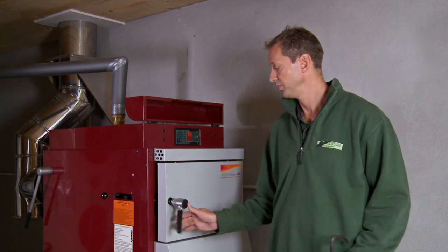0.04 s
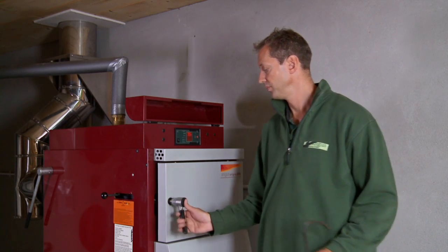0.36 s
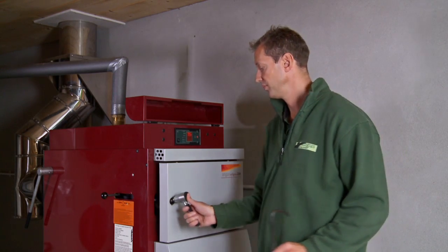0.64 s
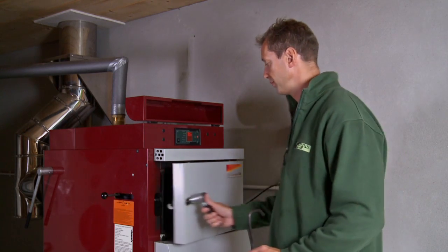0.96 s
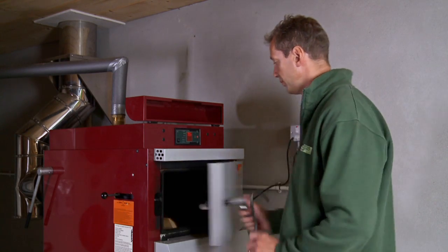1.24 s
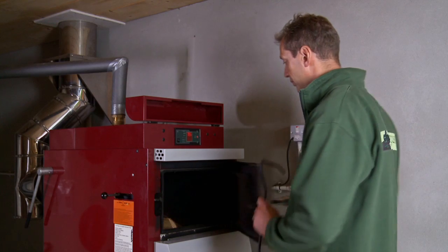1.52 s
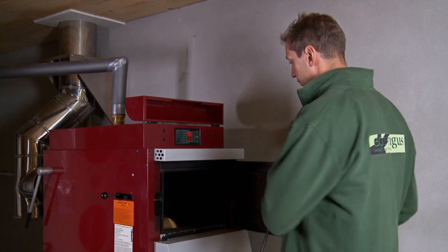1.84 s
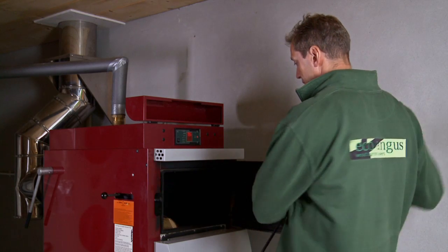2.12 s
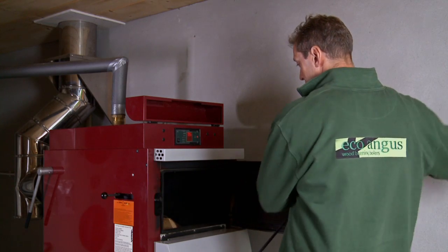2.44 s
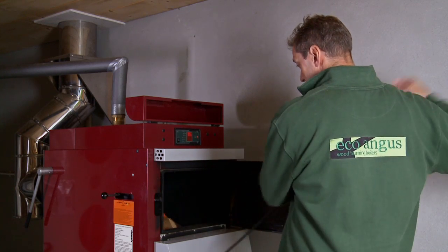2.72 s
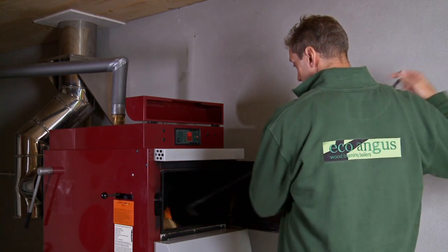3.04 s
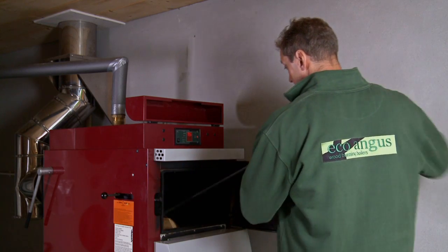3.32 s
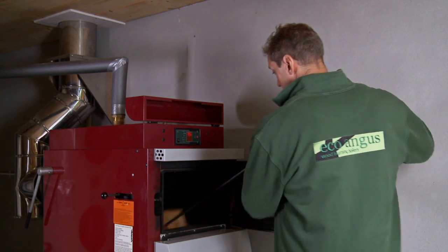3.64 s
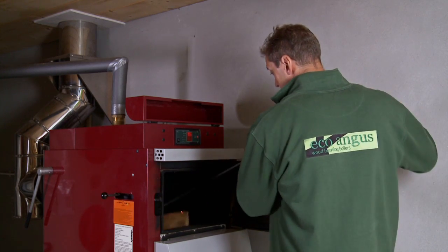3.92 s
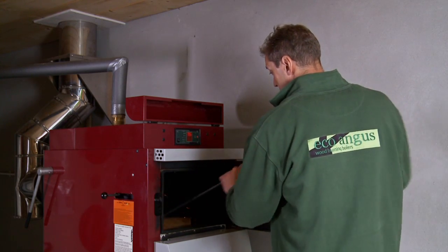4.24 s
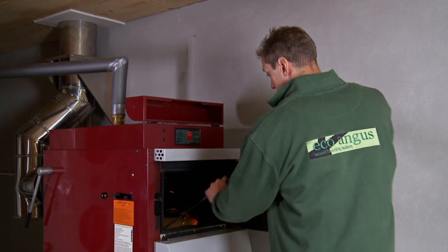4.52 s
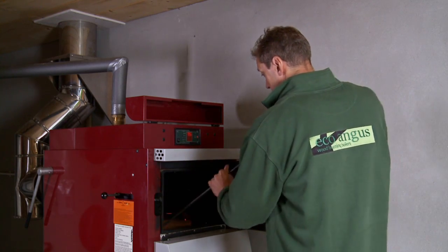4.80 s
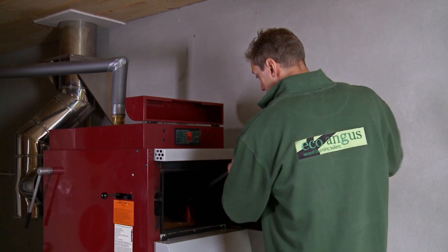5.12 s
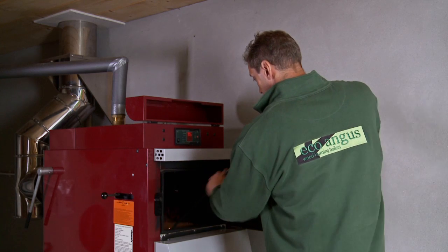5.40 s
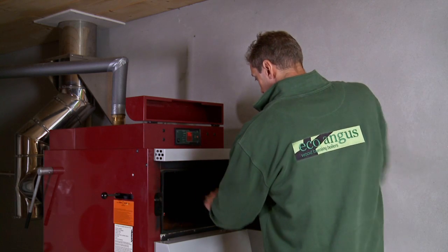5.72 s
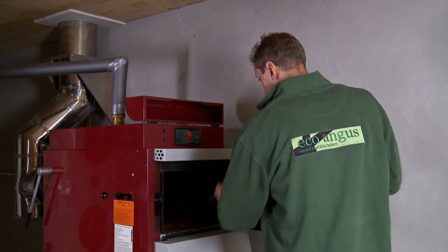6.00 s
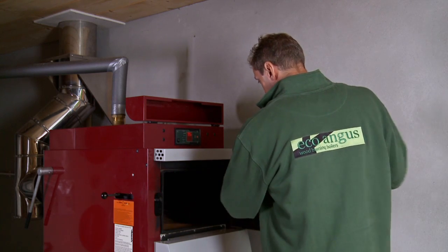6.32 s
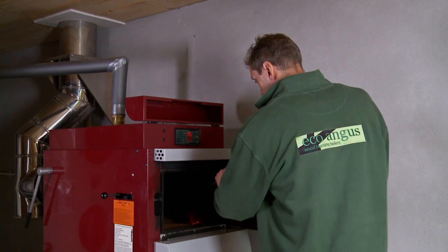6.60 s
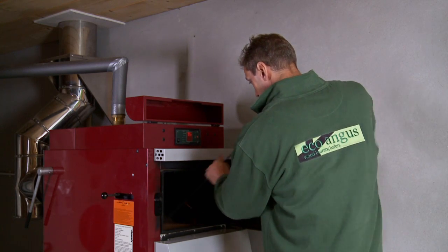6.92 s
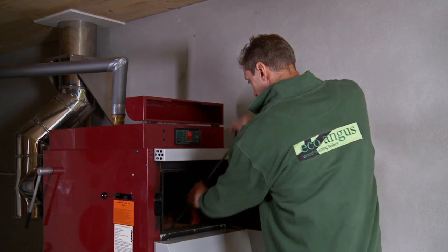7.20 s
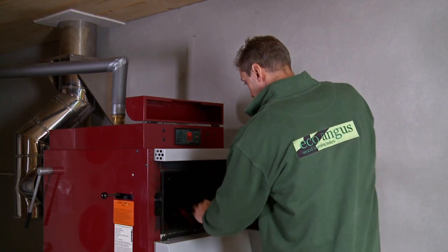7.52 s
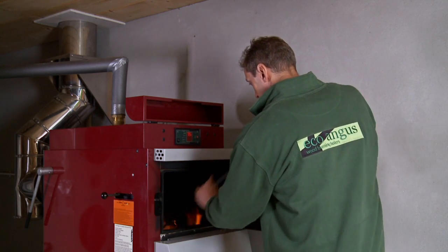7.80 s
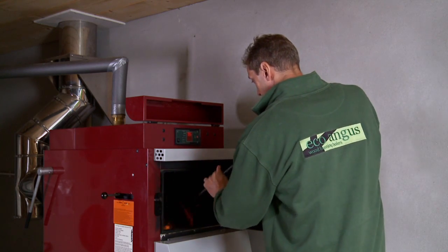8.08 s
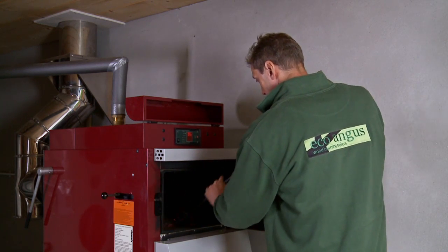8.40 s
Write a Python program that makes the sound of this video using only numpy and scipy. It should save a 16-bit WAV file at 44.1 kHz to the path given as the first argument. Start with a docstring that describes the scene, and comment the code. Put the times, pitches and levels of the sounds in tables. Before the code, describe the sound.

A fan hums steadily in a small room with a short echo. A latch clunks, and a boiler's heavy iron door knocks dully on its hinges as the hum swells and rushing air spills out. Sleeves rustle faintly. A steel poker then rakes crunching embers in uneven strokes, thumping and cracking charred logs, clanking against the firebox and giving brief squeals on the iron. Everything sounds fairly near the microphone.

```python
"""Poking a wood boiler

A draught fan hums in a small plastered room. The boiler's iron door is unlatched and swung wide,
which lets the fan's sound out of the firebox. A steel poker then rakes the embers, thumps and cracks
the charred logs, clanks against the firebox and squeals as it slides on the iron."""
import sys
import numpy as np
from scipy import signal
from scipy.fft import rfft, irfft, next_fast_len
from scipy.io import wavfile

SR = 44100
rng = np.random.default_rng(int(sys.argv[2]) if len(sys.argv) > 2 else 0)


def dump(signal):
    """Clip the signal to [-1, 1] and save it as 16-bit WAV at the path in sys.argv[1]."""
    limited = np.clip(np.atleast_2d(signal).T, -1, 1)
    pcm = np.round(limited * 32767).astype(np.int16)
    wavfile.write(sys.argv[1], SR, pcm)


N = 377055
TIME = np.arange(N) / SR

# The edges in Hz of four bands, from low to high: thud, knock, clang and fizz.
BAND_EDGES_HZ = [120, 700, 2200, 5500, 16000]
# What each kind of contact adds to its level at zero hardness: thud, knock, clang and fizz in dB.
CLANK_BANDS, STROKE_BANDS = (-11.5, -1.5, 5, -4), (0.5, 1, -3, -10)
THUMP_BANDS, CRACK_BANDS = (-1, -2, -14.5, -26), (-5, -0.5, -5, -11.5)
LATCH_BANDS, HINGE_BANDS = (4, -0.5, -8.5, -18.5), (-3, 0, -15, -31.5)

# Blows. Each row: start in seconds, relative level in dB, hardness in dB per octave (harder is
# brighter), t60 (the seconds it takes to fade by 60 dB), note of the struck spot in Hz.
POKER_HITS = [(4.502, -37.5, -7.5, 0.11, 2453), (5.318, -25, 3, 0.062, 4080),
              (7.08, -38.5, -1.5, 0.034, 2830), (7.157, -30, -4, 0.066, 2605),
              (7.546, -33.5, 2.4, 0.056, 3690), (7.621, -26.5, -0.94, 0.08, 3600),
              (8.487, -27, -0.7, 0.068, 2148)]   # the poker strikes the firebox
LOG_HITS = [(3.59, -42, 0.5, 0.05, 860), (4.38, -55, -7.5, 0.19, 340), (4.512, -47.5, -5.5, 0.42, 429),
            (5.839, -37.5, -1, 0.11, 617), (5.883, -42, 2, 0.053, 630), (6.462, -46.5, -6, 0.048, 540),
            (7.536, -30.5, 0.5, 0.16, 1007), (7.565, -32.5, 0.5, 0.32, 511), (7.642, -30, 2, 0.13, 942),
            (7.727, -36.5, 3, 0.093, 958), (8.493, -40, -3, 0.16, 443)]   # logs tumble
LATCH_HITS = [(0.479, -56, -1.5, 0.19, 392), (0.516, -53.5, 1, 0.19, 1940), (0.5485, -35.5, 2, 0.071, 1960),
              (0.567, -46, -0.5, 0.33, 438), (0.692, -53.5, -1.5, 0.17, 427)]   # the handle turns, the latch lets go, the door jumps
HINGE_HITS = [(1.227, -47, -2, 0.1, 820), (1.374, -53, -2, 0.16, 455), (1.519, -42.5, -2, 0.058, 397),
              (1.665, -51, -3, 0.09, 380), (1.727, -39.5, 0, 0.07, 865), (1.869, -41.5, 2.5, 0.18, 414),
              (1.886, -44, -2, 0.076, 420), (2.027, -32.5, 3, 0.075, 803), (2.075, -37.5, 3, 0.043, 850),
              (2.132, -31, 2, 0.072, 817), (2.394, -33.5, 3, 0.024, 2130)]   # the door knocks on its hinges as it swings and settles
# Charred wood cracks. Each row: start in seconds, relative level in dB, hardness in dB per octave.
WOOD_CRACKS = [(3.722, -50.5, 0), (3.744, -54, 3.5), (3.762, -51, 2.5), (3.786, -53, 3), (3.817, -44, -0.5),
               (3.895, -52.5, 3), (4.031, -52, -1.5), (4.852, -51.5, -0.5), (5.485, -44, 2.5),
               (5.736, -45, 1.5), (5.928, -50.5, 1.5), (6.376, -52.5, 0), (6.423, -49, 0.5),
               (6.602, -45.5, -3.5), (6.667, -41, -1), (6.778, -33, -2.7), (6.882, -52.5, 6),
               (6.992, -46.5, 1), (7.403, -42, 1.5), (7.421, -43, 1.5), (8.2, -60, 6.5)]
# The poker rakes the embers. Each row: start and end in seconds, level in dB, hardness in dB per octave.
RAKE_STROKES = [(3.715, 3.96, -53.5, -0.5), (3.98, 4.15, -62, 0), (4.355, 4.49, -54, -1.3),
                (4.488, 4.572, -57.5, 3.5), (4.644, 4.717, -49, -3.5), (4.79, 4.925, -53.5, 0.5),
                (4.907, 5.002, -51, -2), (5.093, 5.218, -56.5, 0.5), (5.452, 5.586, -44, -2.5),
                (5.74, 5.815, -48, -0.5), (5.852, 5.88, -43.5, 0), (5.92, 6.026, -54.5, -0.1),
                (6.129, 6.177, -56, 1.5), (6.248, 6.313, -57.5, 1), (6.453, 6.58, -52.5, -0.1),
                (6.88, 6.951, -57.5, 1.5), (7.082, 7.11, -45.5, -0.5), (7.145, 7.254, -43, -1.5),
                (7.257, 7.343, -46, -1.5), (7.38, 7.52, -48, -1), (7.517, 7.774, -49.5, -1),
                (7.819, 7.97, -51.5, 0), (8.022, 8.065, -56, 2), (8.118, 8.431, -55.5, 0.5)]
# The poker slides on iron. Each row: start and end in seconds, note in Hz, note and overtones in dB.
POKER_SLIDES = [(4.368, 4.607, 2570, -82, -67), (4.633, 4.725, 3500, -60, -58.5),
                (4.924, 4.994, 7650, -64, -52), (4.932, 4.992, 1770, -46, -62),
                (5.52, 5.587, 3430, -54, -52.5), (5.978, 6.043, 4000, -64, -75),
                (6.449, 6.603, 3930, -57.5, -79), (7.82, 7.896, 3930, -62, -71),
                (8.029, 8.06, 3970, -50, -65), (8.235, 8.293, 3930, -61, -56)]
# The door seal rubs, then sleeves do. Each row: start and end in seconds, rub in dB, hiss in dB.
SOFT_RUBS = [(0.694, 0.774, -51.5, -73), (0.918, 0.957, -62.5, -73), (2.239, 2.31, -50, -63),
             (2.53, 2.646, -72, -70), (2.7, 2.822, -64, -70), (2.832, 2.916, -71, -63.5),
             (3.1, 3.18, -81, -73)]
# How freely the firebox sounds into the room. Each row: time in seconds, opening from 0 to 1.
DOOR_OPENING = [(0.6, 0), (0.8, 0.03), (1.05, 0.23), (1.3, 0.64), (1.7, 0.79), (2.1, 0.88), (3.5, 0.75),
                (5.0, 1), (8.5, 0.93)]

# Modes, the pitches a thing rings at. Each row: pitch in Hz, width in Hz, relative strength in dB.
ROD_MODES = [(950, 30, -9), (2135, 33, -8), (2290, 26, -6), (2500, 60, -4), (2831, 27, 0), (3100, 40, -6),
             (3550, 47, 0), (3978, 50, 0), (4240, 33, -8), (4885, 56, -6), (5170, 45, -11), (5601, 35, -5),
             (6260, 80, -12), (6620, 70, -11), (6810, 50, -14), (7450, 30, -12), (7620, 33, -11),
             (8160, 35, -13), (8460, 30, -12), (9100, 70, -18), (9740, 40, -17), (10200, 45, -21),
             (11280, 60, -23), (11990, 60, -25), (12800, 90, -26)]   # the steel poker
BOLT_MODES = [(156, 22, -10), (228, 25, 1), (334, 30, -1), (426, 50, 8), (568, 40, 5.5), (790, 40, -19),
              (1146, 51, 6), (1470, 29, -3), (1770, 30, -10), (1860, 30, -3), (2200, 50, -11),
              (2850, 55, -31), (3530, 28, -9), (3670, 45, -4), (5100, 80, -15), (7360, 80, -28)]   # the latch bolt
DOOR_MODES = [(427, 50, 3.5), (644, 40, -28), (762, 50, 4), (952, 50, 6), (1155, 50, -3), (1474, 35, 0.5),
              (1770, 60, 2.5), (1910, 60, -14), (2420, 50, -5), (2670, 32, -4), (3030, 32, -9),
              (3800, 36, -17), (11530, 90, -25)]   # the iron door
FIREBOX_MODES = [(57, 16, 5.9), (116, 11, 8), (164.3, 46, 10.9), (323.4, 69, 15.7), (500, 88, 10.5),
                 (659.5, 45, 16), (790, 16, 8.4), (851, 61, 23), (1244, 188, 18.3), (2450, 170, 5.4),
                 (2720, 590, 5.7), (4440, 330, 4.5)]   # the air inside the firebox

# Colours, how noise is spread from bass to treble. Each row: frequency in Hz, relative level in dB.
IRON_COLOUR = [(30, -43.5), (80, -31.5), (150, 0), (400, 7.5), (1000, 4), (2200, 4.5), (3800, 8), (5000, 0),
               (8000, -5.5), (12000, -12), (16000, -21)]   # the struck firebox
CHAR_COLOUR = [(40, -52), (100, -28), (170, -1), (450, 2), (1300, 3), (2600, -10.5), (5000, -20.5),
               (9000, -19), (16000, -27)]   # charred wood
FRICTION_COLOUR = [(900, -16), (2000, 3), (3500, -11), (5000, -11), (8000, -2), (13000, 0), (16000, -4)]   # steel sliding on iron
PANEL_COLOUR = [(40, -55), (90, -28), (150, -7.5), (400, 8), (900, 4.5), (2100, 8), (3200, -6.5),
                (5000, -21), (9800, -29.5), (11300, -27), (12400, -39), (16000, -40)]   # the door panel
CLOTH_COLOUR = [(150, -7), (700, 10), (2500, 6.5), (5000, -5.5), (10000, -16), (16000, -25)]   # rubbing fibres
CASING_COLOUR = [(25, -41), (55, -26.5), (100, -7), (160, -0.5), (310, -1), (430, -9.5), (600, -8.5),
                 (800, -7), (1300, -14.5), (1900, -21.5), (2600, -22), (3500, -29), (6000, -35),
                 (16000, -38)]   # the boiler's casing
DRAUGHT_COLOUR = [(22, -31), (50, -9), (110, -1.5), (200, -1.5), (400, -8), (700, -5.5), (1000, -20.5),
                  (1500, -8.5), (1900, -18), (3400, -21.5), (6000, -29), (16000, -43)]   # rushing air


def poker(thump_s=5.3185, thump_hz=92, thump_t60=0.059):
    """Steel clanks on iron, stilled by the hand; a deep, short thump comes with the hardest blow."""
    clanks = blows(POKER_HITS, CLANK_BANDS, ROD_MODES, IRON_COLOUR, wash_db=-3.5, note_db=-3.5,
                   ring_db=-38.5, ring_t60=0.47, rise_s=0.0006, bass_hold=1.2, bass_trade=0)
    t = np.maximum(TIME - thump_s, 0)
    boom = from_db(-30) * np.sin(2 * np.pi * thump_hz * t)
    thud = from_db(-16) * coloured(rng.standard_normal(N), CASING_COLOUR)
    return from_db(0.5) * clanks + (boom + thud) * (t > 0) * fade(np.minimum(t, 1), thump_t60)


def logs(crack_t60=0.04, crack_hz=1247):
    """Logs thump dully and crack, barely stirring the rod. A crack rings briefly at a firebox mode."""
    thumps = blows(LOG_HITS, THUMP_BANDS, ROD_MODES, CHAR_COLOUR, wash_db=31.5, note_db=31,
                   ring_db=-28, ring_t60=0.37, rise_s=0.0011, bass_hold=0.98, bass_trade=1.1)
    crack_hits = [(*row, crack_t60, crack_hz) for row in WOOD_CRACKS]
    cracks = blows(crack_hits, CRACK_BANDS, ROD_MODES, CHAR_COLOUR, wash_db=28.5, note_db=24.5,
                   ring_db=-28, ring_t60=0.33, rise_s=0.00089, bass_hold=0.74, bass_trade=0.14)
    return from_db(-1.85) * thumps + from_db(-1.93) * cracks


def raking(trickle_span_s=(3.5, 8.55), trickle_db=-65):
    """Embers crumble under each stroke: crisp snaps over a fine rasp, both passing along the rod."""
    fractures = filtered(grains(per_s=60, spread_db=2.6, clump_db=2), 1, 2200, "high")
    snaps = bursts(fractures, decay_s=0.0032)
    rasp = grains(per_s=6700, spread_db=3.5, clump_db=3.5)
    rod = [(hz, width, db / 4) for hz, width, db in ROD_MODES]   # rubbing stirs the modes almost evenly
    scrape = coloured(0.95 * rms_one(snaps) + rms_one(rasp), CHAR_COLOUR, rod, peak_db=7)
    trickle = (*trickle_span_s, trickle_db, 0)   # embers keep trickling between strokes
    gains = 0
    for start, end, level_db, hardness in RAKE_STROKES + [trickle]:
        pressure = swell(start, end, attack_s=0.0079, release_s=0.025)
        levels_db = band_levels(level_db, hardness, STROKE_BANDS, bass_trade=0.079)
        gains = np.maximum(gains, np.outer(from_db(levels_db), pressure))
    return sum(gain * rms_one(filtered(scrape, 3, [low, high], "band"))
               for low, high, gain in zip(BAND_EDGES_HZ, BAND_EDGES_HZ[1:], gains))


def sliding(edge_s=0.0182, note_width_hz=100):
    """The rod sticks and slips on the iron like a bowed string, singing a note with overtones."""
    out = np.zeros(N)
    for start, end, note_hz, note_db, overtones_db in POKER_SLIDES:
        t = np.arange(round((end - start) * SR)) / SR
        slips = rng.standard_normal(len(t)) ** 3   # cubing makes the noise spiky
        note = rms_one(signal.lfilter(*signal.iirpeak(note_hz, note_hz / note_width_hz, SR), slips))
        overtones = coloured(slips, FRICTION_COLOUR, ROD_MODES, peak_db=26)
        pressure = np.minimum(np.minimum(t, t[::-1]) / edge_s, 1)
        at = round(start * SR)
        out[at:at + len(t)] += pressure * (from_db(note_db) * note + from_db(overtones_db) * overtones)
    return out


def door():
    """The latch clunks, then the heavy door knocks dully on its hinges."""
    latch = blows(LATCH_HITS, LATCH_BANDS, BOLT_MODES, PANEL_COLOUR, wash_db=7.5, note_db=-6,
                  ring_db=-24, ring_t60=0.32, rise_s=0.00089, bass_hold=0.99, bass_trade=1)
    hinge = blows(HINGE_HITS, HINGE_BANDS, DOOR_MODES, PANEL_COLOUR, wash_db=0.5, note_db=0.5,
                  ring_db=-42, ring_t60=0.27, rise_s=0.0013, bass_hold=1.5, bass_trade=1.36)
    return from_db(0.2) * latch + from_db(-0.14) * hinge


def rubbing(attack_s=0.035, release_s=0.04):
    """Fibres slip in a fine, soft hiss that swells with each movement."""
    slips = grains(per_s=9700, spread_db=1, clump_db=2)
    rub = coloured(slips, CLOTH_COLOUR)
    hiss = rms_one(filtered(slips, 2, 5500, "high"))
    return sum(swell(start, end, attack_s, release_s) * (from_db(rub_db) * rub + from_db(hiss_db) * hiss)
               for start, end, rub_db, hiss_db in SOFT_RUBS)


def fan(blade_hz=285.7, shut_db=-58, open_db=-46.5):
    """The blades hum over rushing air; the open door lets out more hum and the firebox's draught."""
    opening = door_opening()
    phase = 2 * np.pi * blade_hz * TIME + 0.56 * drift(0.64) + 0.08 * drift(7.6)   # swirling air jostles it
    hum = np.sqrt(2) * np.sin(phase) * from_db(1.75 * drift(15))
    casing = from_db(-57) * coloured(rng.standard_normal(N), CASING_COLOUR)
    draught = from_db(-50.5) * opening * coloured(rng.standard_normal(N), DRAUGHT_COLOUR, FIREBOX_MODES)
    return hum * (from_db(shut_db) + from_db(open_db) * opening) + casing + draught


def fire(level_db=-79):
    """Glowing wood ticks faintly by itself, heard once the door is open."""
    ticks = bursts(grains(per_s=9, spread_db=2, clump_db=1.5), decay_s=0.0015)
    return from_db(level_db) * door_opening() * rms_one(filtered(ticks, 2, 2500, "high"))


def room(x, t60=0.38, treble_t60=0.25, split_hz=3500, build_s=0.011):
    """Echoes from the close walls blur together; the treble dies first."""
    t = np.arange(SR // 2) / SR
    noise = rng.standard_normal(len(t))
    dull = filtered(noise, 1, split_hz, "low")
    echoes = dull * fade(t, t60) + (noise - dull) * fade(t, treble_t60)
    echoes *= 1 - np.exp(-(t / build_s) ** 2)
    return signal.fftconvolve(x, echoes / np.linalg.norm(echoes))[:N]


def blows(hits, bands_db, modes, colour, wash_db, note_db, ring_db, ring_t60,
          rise_s, bass_hold, bass_trade):
    """Each hit sets off clear modes, a note and a wash of noise; most dies fast, a little rings on."""
    t = np.arange(SR * 3 // 4) / SR
    hz, width, mode_db = np.transpose(modes)[:, :, None]
    out = np.zeros(N + len(t))
    for start, level_db, hardness, t60, note_hz in hits:
        strength = from_db(mode_db + 2.5 * rng.standard_normal(hz.shape))   # varies with the spot struck
        strength /= np.linalg.norm(strength)
        tones = np.sqrt(2) * np.sin(2 * np.pi * (hz * t + rng.random(hz.shape)))
        damped = fade(t, t60)
        # once the contact lets go, the modes ring on more evenly, the narrow ones longest
        free = np.sqrt(strength) * from_db(ring_db) * fade(t, ring_t60 / np.sqrt(width / np.median(width)))
        ringing = np.sum(tones * (strength * damped + free), axis=0)
        # weaker tones close by roughen the note
        neighbours = np.sin(2 * np.pi * note_hz * rng.uniform(0.92, 1.08, (4, 1)) * t).sum(axis=0)
        note = from_db(note_db) * (np.sin(2 * np.pi * note_hz * t) + 0.23 * neighbours)
        wash = from_db(wash_db) * coloured(rng.standard_normal(len(t)), colour)
        bass = filtered(wash, 1, 1200, "low")   # lasts bass_hold times as long as the rest
        blow = ringing + (note + wash - bass) * damped + bass * damped ** (1 / bass_hold)
        blow *= 1 - np.exp(-t / rise_s)
        levels_db = band_levels(level_db, hardness, bands_db, bass_trade)
        at = round(start * SR)
        out[at:at + len(t)] += balanced(balanced(blow, levels_db), levels_db)   # twice gets closer
    return out[:N]


def band_levels(level_db, hardness, bands_db, bass_trade):
    """Each band's level in dB: a harder contact gains treble and, scaled by bass_trade, loses thud."""
    centres = np.sqrt(np.multiply(BAND_EDGES_HZ[1:], BAND_EDGES_HZ[:-1]))
    octaves = np.log2(centres / centres[1])   # counted from the knock band
    return level_db + np.array(bands_db) + hardness * np.where(octaves < 0, bass_trade * octaves, octaves)


def balanced(x, levels_db):
    """Reshape a blow's tone so that its first 20 ms come near the given level in each band."""
    size, edges = SR // 50, np.array(BAND_EDGES_HZ)
    power = 2 * abs(rfft(x[:size]) / size) ** 2
    band_power, _ = np.histogram(np.fft.rfftfreq(size, 1 / SR), edges, weights=power)
    change_db = np.array(levels_db) - 10 * np.log10(band_power + 1e-20)
    hz = np.maximum(np.fft.rfftfreq(2 * len(x), 1 / SR), 1)
    tilt_db = np.interp(np.log(hz), np.log(edges[1:] * edges[:-1]) / 2, change_db)
    return irfft(rfft(x, 2 * len(x)) * from_db(tilt_db))[:len(x)]


def coloured(x, colour, modes=(), peak_db=0):
    """Give x a broad colour with any modes standing out of it, at an average level of 1."""
    size = next_fast_len(len(x))
    hz = np.maximum(np.fft.rfftfreq(size, 1 / SR), 1)
    points_hz, levels_db = np.transpose(colour)
    lift = 1 + sum(from_db(db + peak_db) ** 2 / (1 + (2 * (hz - centre) / width) ** 2) ** 2.54
                   for centre, width, db in modes)
    gain = from_db(np.interp(np.log(hz), np.log(points_hz), levels_db)) * np.sqrt(lift)
    return rms_one(irfft(rfft(x, size) * gain, size)[:len(x)])


def grains(per_s, spread_db, clump_db):
    """Tiny breaks and slips: random clicks of uneven size, louder in clumps."""
    sizes = from_db(spread_db * np.minimum(rng.exponential(1, N), 4) + clump_db * drift(28))
    return sizes * rng.choice([-1, 1], N) * (rng.random(N) < per_s / SR)


def bursts(clicks, decay_s):
    """Turn each click into a short, dying burst of noise."""
    t = np.arange(SR // 50) / SR
    return signal.fftconvolve(clicks, rng.standard_normal(len(t)) * np.exp(-t / decay_s))[:N]


def drift(rate_hz, step=40, warm_up=2000):
    """A slow random wander, about 1 in size."""
    pole = np.exp(-2 * np.pi * rate_hz * step / SR)
    noise = rng.standard_normal(N // step + warm_up + 2)
    slow = signal.lfilter([1], [1, -2 * pole, pole * pole], noise)[warm_up:]
    return np.interp(np.arange(N) / step, np.arange(len(slow)), rms_one(slow))


def door_opening():
    """How open the door is at every sample."""
    return np.interp(TIME, *np.transpose(DOOR_OPENING))


def swell(start, end, attack_s, release_s):
    """Pressure builds, holds until the end of the stroke and dies away."""
    return np.clip((TIME - start) / attack_s, 0, 1) * np.exp(-np.clip((TIME - end) / release_s, 0, 20))


def fade(t, t60):
    """Fall by 60 dB every t60 seconds."""
    return from_db(-60 * t / t60)


def filtered(x, order, hz, kind):
    """Keep the lows, the highs or a band; a higher order cuts more steeply."""
    return signal.sosfilt(signal.butter(order, hz, kind, fs=SR, output="sos"), x)


def from_db(db):
    """Turn decibels into a gain."""
    return 10 ** (np.asarray(db) / 20)


def rms_one(x):
    """Scale x to an average level (rms) of 1."""
    return x / np.sqrt(np.mean(x ** 2) + 1e-20)


def scene():
    """Sounds from outside and inside the firebox echo in the room, over the fan."""
    outside = door() + rubbing()
    inside = poker() + logs() + raking() + sliding() + fire()
    return (fan() + outside + inside + room(from_db(-11) * outside + from_db(-16) * inside))[None]


def record(dry, low_cut_hz=42, ceiling=0.78, high_cut_hz=16200):
    """The microphone sheds the deepest bass, the hardest peak is rounded, the top is cut steeply."""
    lean = filtered(dry, 2, low_cut_hz, "high")
    rounded = lean / (1 + (lean / ceiling) ** 4) ** 0.25
    return signal.sosfilt(signal.ellip(10, 0.1, 80, high_cut_hz, fs=SR, output="sos"), rounded)


dry = scene()
out = record(dry)
dump(out)
```